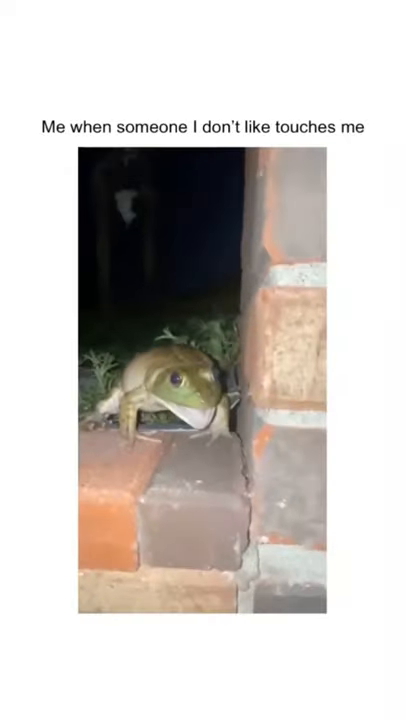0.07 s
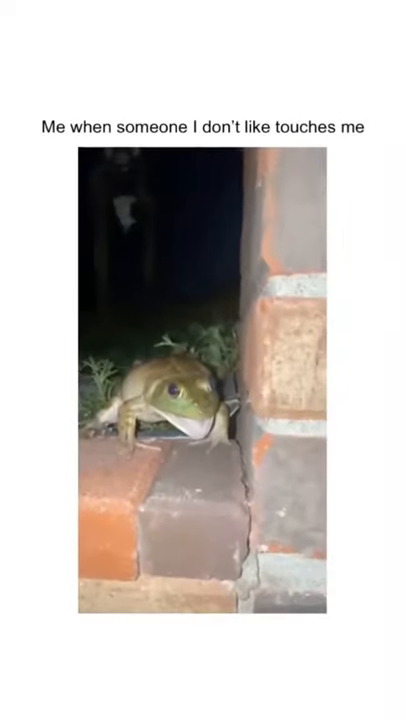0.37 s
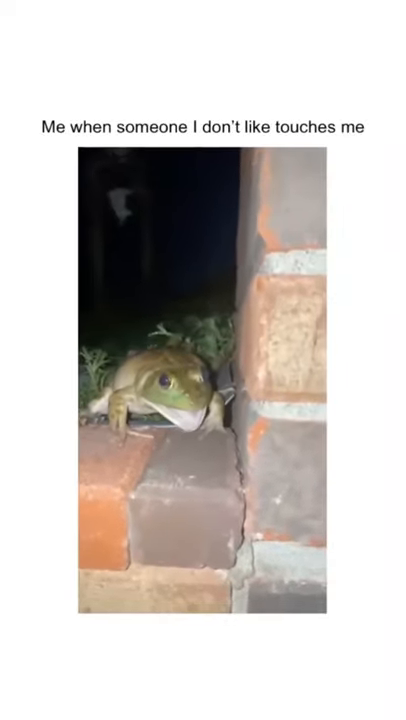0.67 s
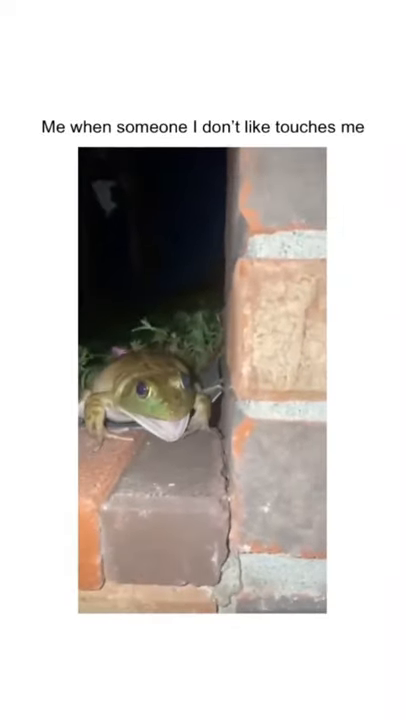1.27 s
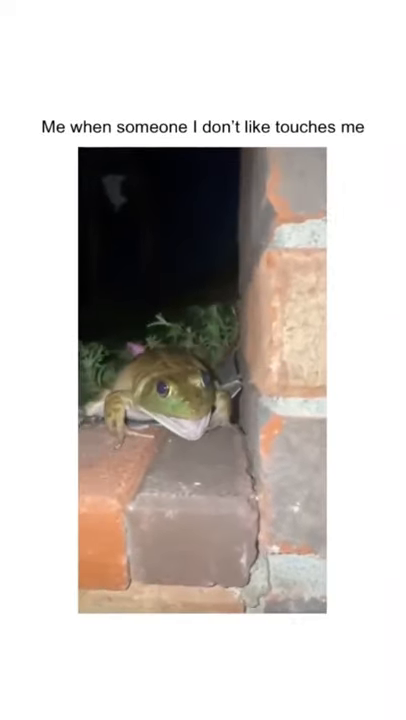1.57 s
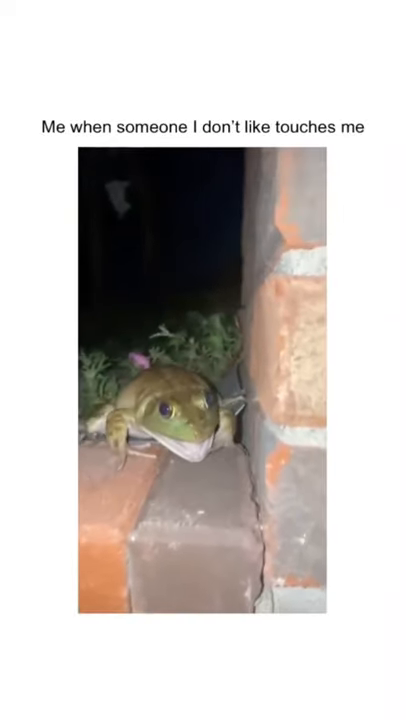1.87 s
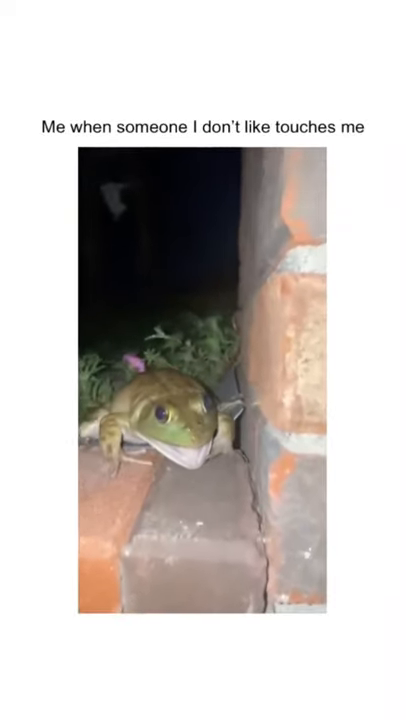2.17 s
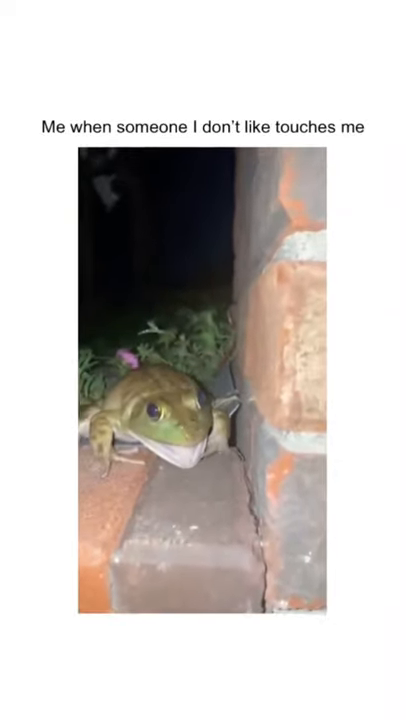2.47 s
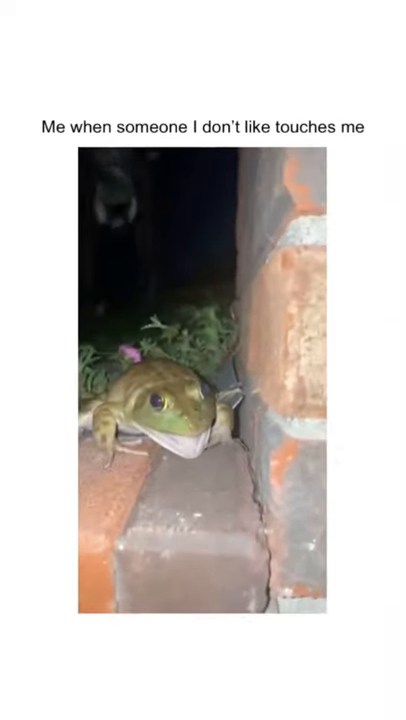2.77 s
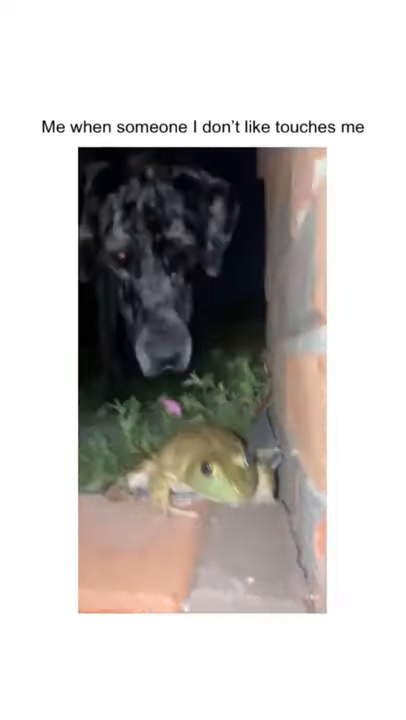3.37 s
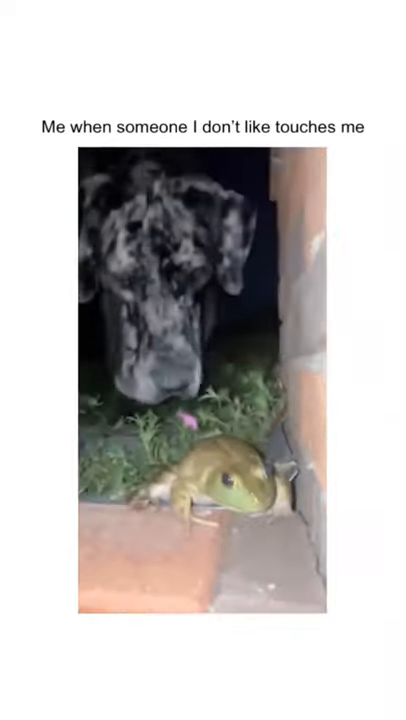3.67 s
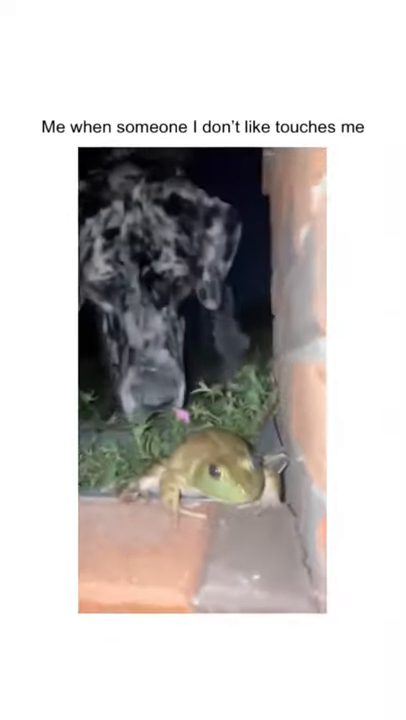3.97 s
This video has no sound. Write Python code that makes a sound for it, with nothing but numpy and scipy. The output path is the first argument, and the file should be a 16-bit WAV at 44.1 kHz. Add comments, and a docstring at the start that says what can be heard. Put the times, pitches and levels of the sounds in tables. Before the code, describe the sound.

A frog screams loudly up close, then breaks into a harsh screech outdoors.

```python
"""Screaming frog at night

A frog on a brick step screams open-mouthed, up close. The clear scream roughens, flips up into a thin
squeal, breaks into a chaotic screech and ends in falling cries and a squeak. Its vocal folds snap
through a resonant throat; the highest notes are whistle-like. Soft handling bumps, faint rustles and
a tick sit over a low outdoor rumble."""
import sys
import numpy as np
from scipy import signal
from scipy.fft import rfft, irfft, next_fast_len
from scipy.io import wavfile
from scipy.ndimage import map_coordinates

SR = 44100
rng = np.random.default_rng(int(sys.argv[2]) if len(sys.argv) > 2 else 0)


def materialize(psi):
    """Save the field psi as 16-bit PCM at rate SR to the path in sys.argv[1].

    A 1-D psi becomes a single channel; in a 2-D psi each row is a channel.
    """
    bounded = np.clip(np.atleast_2d(psi).T, -1, 1)
    quanta = np.round(bounded * 32767).astype(np.int16)
    wavfile.write(sys.argv[1], SR, quanta)


N = 176400

# Night bed, tone: freq_hz, gain_db
NIGHT_EQ = [(15, -50.5), (25, -9.5), (111, 0.5), (174, -9), (385, -17), (1180, -28.5), (3690, -34),
            (7600, -35.5), (9500, -47)]
# Night bed, fader: time_s, level_db
NIGHT_LEVEL = [(0, -52), (2.9, -45), (3.65, -50), (4, -47)]

# Scream, rate of the folds: time_s, pitch_hz
SCREAM_PITCH = [(0.015, 685.1), (0.219, 674.3), (0.455, 668.4), (0.521, 672.8), (0.665, 665.5),
                (0.695, 684), (0.721, 645.6), (0.749, 673.6), (0.765, 667), (0.777, 674.5), (0.807, 661),
                (0.815, 678), (0.913, 687.6), (0.939, 680.4)]
# Scream, envelope: time_s, level_db, roughness (0 is clean)
SCREAM_ENVELOPE = [(0, -16, 0.01), (.2, -14.5, 0.01), (.3, -15, 0.09), (.48, -13, 0.05), (.62, -14, 0.17),
                   (.73, -15.5, 0.2), (.77, -14.5, 0.55), (.86, -16, .6), (.945, -17.5, 1.04),
                   (.965, -27, 0.8), (1.03, -64.5, 1), (1.06, -110, 1.23)]
# Shrill tones, a fixed step above the scream's harmonics: harmonic, gain_db
SHRILL_TONES = [(2, -16), (3, -12), (4, -12.5), (5, -18)]
# Throat and mouth resonances for each voice: freq_hz, gain_db
SCREAM_THROAT = [(300, -47), (680, -21), (950, -25.5), (1350, -13), (1650, -24.5), (2020, -14), (2250, -14),
                 (2700, -7.5), (2980, -16.5), (3380, 0.5), (3700, -1), (4050, -3.5), (4350, -17.5),
                 (4720, -10.5), (5400, -10), (6100, -11), (6400, -13), (6700, -30.5)]
SCREECH_THROAT = [(250, -45), (480, -18.5), (670, -5.5), (900, -8.5), (1250, -4), (1550, -8), (1900, -5),
                  (3000, -2.5), (3450, -3), (3800, 0.5), (4250, -12), (5500, -9), (6400, -12),
                  (6620, -14.5), (7300, -8.5), (8400, -9.5), (9300, -31)]
WAVERING_THROAT = [(400, -54.5), (1200, 1), (3900, 3), (4250, -2), (7000, -37.5)]
CRY_THROAT = [(300, -28), (580, -7.5), (1170, -5.5), (1550, -13), (2350, -5), (3200, -7), (3850, -8),
              (4300, -20.5), (6800, -19), (7900, -20.5), (9300, -40.5)]
# Breath, hoarse and whistling: freq_hz, gain_db
HOARSE_AIR_EQ = [(1000, -40.5), (2700, -18), (3500, -10), (4400, -4.5), (6400, -17), (7400, 5), (8400, 0.5),
                 (9300, -36.5)]
WHISTLE_AIR_EQ = [(500, -30.5), (1400, -13.5), (2100, -29), (2700, -6.5), (3900, -6), (5400, -25),
                  (6500, -4.5), (7600, -20.5), (8250, 2.5), (9200, -32)]

# Sinking squeal and last squeak: time_s, pitch_hz, fundamental_db, overtones_db
SQUEAL = [(.94, 1704, -70, -80), (.968, 1688, -32, -38.5), (1, 1666, -32.5, -29.5),
          (1.026, 1642, -50.5, -33), (1.05, 1615, -30, -33.5), (1.12, 1594, -30, -36.5),
          (1.2, 1575, -34, -34), (1.32, 1517, -33, -38.5), (1.39, 1478, -45, -34), (1.42, 1470, -75, -62)]
SQUEAK = [(2.79, 1102, -55, -40.5), (2.822, 1118, -41, -30), (2.845, 1060, -38.5, -32),
          (2.872, 983, -55, -46), (2.92, 950, -72, -78)]
# Their overtone balance: harmonic, gain_db
SQUEAL_PARTIALS = [(2, -3.5), (3, -1), (4, -10.5)]
SQUEAK_PARTIALS = [(2, -18), (3, -1), (6, -9)]
# Handling bumps: start_s, level_db, pitch_hz, length_s
BUMPS = [(1.122, -34.5, 68, 0.053), (3.643, -36.5, 68.9, 0.034), (3.713, -28, 69.7, 0.049),
         (3.816, -27.5, 58.6, 0.035)]
# Screech, envelope: time_s, level_db
SCREECH_LEVEL = [(1.3, -83.5), (1.329, -37.5), (1.334, -26.5), (1.368, -24), (1.38, -42), (1.402, -33),
                 (1.412, -22.5), (1.44, -37.5), (1.462, -36), (1.475, -26), (1.505, -32), (1.545, -23),
                 (1.625, -28), (1.645, -24), (2.1, -22.5), (2.55, -22.5), (2.615, -21.5), (2.645, -35.5),
                 (2.695, -36), (2.71, -28.5), (2.73, -40), (2.8, -30.5), (2.845, -38), (2.88, -48.5),
                 (2.95, -70)]
# Wavering tone inside the screech: time_s, pitch_hz, level_db
WAVERING_TONE = [(1.38, 1473, -82), (1.43, 1440, -31.5), (1.61, 1418, -27.5), (1.72, 1344, -28),
                 (1.82, 1319, -29), (1.91, 1262, -28.5), (1.97, 1294, -30), (2.1, 1219, -30),
                 (2.45, 1214, -35), (2.58, 1261, -34), (2.64, 1250, -98)]
# Closing cries: start_s, length_s, first_hz, last_hz, level_db, roughness, limp_cycles
CRIES = [(2.627, 0.082, 784.5, 734, -23.5, 0, 0), (2.713, .046, 585.6, 591, -25, 0.17, 0.029),
         (2.761, 0.027, 594.7, 584, -26, .25, 0), (2.781, 0.035, 604.3, 630, -31, .8, 0.013)]

# Plant scuffs: start_s, length_s, level_db, brightness_db
RUSTLES = [(3.155, .055, -42.5, -7), (3.214, 0.054, -42.5, -11.5), (3.253, 0.073, -56.5, 25),
           (3.348, 0.083, -59.5, 25), (3.819, 0.043, -51.5, 22.5), (3.858, 0.079, -54.5, -2.5)]
# Tone of the scuffs' body, their fizz and the tick: freq_hz, gain_db
RUSTLE_BODY_EQ = [(200, -43), (400, 5.5), (520, -8.5), (660, 2.5), (1100, -11.5), (1800, -20.5),
                  (9000, -43)]
RUSTLE_FIZZ_EQ = [(1000, -7), (8000, -4.5), (9500, -16)]
TICK_EQ = [(600, -4), (2000, 11), (3600, -6.5), (9000, -7)]


def amp(db):
    """Decibels to gain."""
    return 10 ** (np.asarray(db) / 20)


def unit(x):
    """Scale to rms 1."""
    return x / np.sqrt(np.mean(x ** 2) + 1e-20)


def clock():
    """Time of each sample in seconds."""
    return np.arange(N) / SR


def curves(rows):
    """One automation curve for each column after the time."""
    times, *columns = np.transpose(rows)
    return [np.interp(clock(), times, column) for column in columns]


def wobble(rate_hz):
    """Smooth random modulation."""
    return map_coordinates(rng.standard_normal(N // 4), [clock() * rate_hz], mode="wrap")


def gate(start_s, length_s, edge_s=0.006):
    """Attack, hold, release."""
    t = clock() - start_s
    return np.clip(np.minimum(t, length_s - t) / edge_s + .5, 0, 1)


def colour(x, eq):
    """Minimum-phase EQ: resonances ring only after each snap."""
    size = 2 * next_fast_len(N // 2 + SR // 10)
    hz, db = np.transpose(eq)
    gain = amp(np.interp(np.log(np.fft.rfftfreq(size, 1 / SR) + 1), np.log(hz), db))
    cepstrum = irfft(np.log(gain))
    cepstrum[1:size // 2] *= 2
    cepstrum[size // 2 + 1:] = 0
    return irfft(rfft(x, size) * np.exp(rfft(cepstrum)))[:N]


def noise(eq):
    """Coloured noise of rms 1."""
    return unit(colour(rng.standard_normal(N), eq))


def night_air():
    """A low outdoor rumble, gently rising and falling."""
    level_db, = curves(NIGHT_LEVEL)
    return amp(level_db) * noise(NIGHT_EQ)


def fold_snaps(hz, rough, jitter, scatter_db=0, limp=0):
    """One snap per vocal-fold cycle; roughness scatters time and size, limp swings alternate snaps."""
    cycles = np.cumsum(hz) / SR
    count = np.arange(1, int(cycles[-1]))
    onsets = np.interp(count, cycles, np.arange(N))
    index = onsets.astype(int)
    rough, limp = [(v * np.ones(N))[index] for v in (rough, limp)]
    time_draw, size_draw = rng.standard_normal((len(count), 2)).T
    shift_cycles = rough * jitter * time_draw + limp * (-1.) ** count
    onsets = onsets + shift_cycles * SR / hz[index]
    taps = np.floor(onsets)[:, None] + np.arange(-7, 9)
    offset = taps - onsets[:, None]
    click = np.sinc(offset) * np.cos(np.pi * offset / 16) ** 2  # can land between samples
    snaps = click * amp(scatter_db * rough * size_draw)[:, None]
    return -np.bincount(np.clip(taps, 0, N - 1).astype(int).ravel(), snaps.ravel(), N)


def scream(shrill_step_hz=5512, air_db=-9):
    """Steady snaps begin to alternate, flutter and roughen, with shrill tones on top and air late on."""
    hz, = curves(SCREAM_PITCH)
    level_db, rough = curves(SCREAM_ENVELOPE)
    hz = hz * (1 + .0005 * wobble(220) + .01 * rough ** .5 * wobble(170))
    limp = 0.014 * rough * (1 + wobble(260))
    snaps = fold_snaps(hz, rough ** 2, jitter=.02, scatter_db=3.5, limp=limp)
    voice = unit(colour(snaps, SCREAM_THROAT))
    phase = 2 * np.pi * np.cumsum(hz) / SR
    step_phase = 2 * np.pi * shrill_step_hz * clock()
    shrill = np.zeros(N)
    for harmonic, gain_db in SHRILL_TONES:
        flicker = amp(gain_db + rough * (3 * wobble(110) - 12))  # ducks as the voice roughens
        shrill += flicker * np.sin(round(harmonic) * phase + step_phase + rough * wobble(300))
    shrill *= 1 + rough * np.cos(phase / 2)  # throbs on every other cycle
    air = unit(noise(HOARSE_AIR_EQ) * (1 + np.cos(phase)))
    envelope = amp(level_db + 1.5 * rough * wobble(130))
    return envelope * (voice + np.sqrt(2) * shrill + amp(air_db) * rough ** 1.5 * air)


def brick_reverb(x, wet_db=-26, t60_s=.25):
    """A faint, short answer from the brickwork."""
    tail = (rng.standard_normal(N) * amp(-60 * clock() / t60_s))[:SR // 3]
    return x + amp(wet_db) * signal.fftconvolve(x, tail / np.linalg.norm(tail))[:N]


def whistle(track, partials, air_db):
    """The voice's high register: a fundamental and fluttering overtones over rushing air."""
    hz, fundamental_db, overtones_db = curves(track)
    phase = 2 * np.pi * np.cumsum(hz * (1 + .004 * wobble(350))) / SR
    overtones = sum(amp(db + 2.8 * wobble(110)) * np.sin(round(k) * phase) for k, db in partials)
    top = unit(overtones) + amp(air_db) * noise(WHISTLE_AIR_EQ)
    sounding = (clock() > track[0][0]) & (clock() < track[-1][0])
    return sounding * (amp(fundamental_db) * unit(np.sin(phase)) + amp(overtones_db) * top)


def handling_bumps():
    """Soft thumps, a few low cycles each, as a hand shifts its grip."""
    out = np.zeros(N)
    for start_s, level_db, hz, length_s in BUMPS:
        progress = np.clip((clock() - start_s) / length_s, 0, 1)
        swell = np.abs(np.sin(np.pi * progress ** 0.36))
        out += amp(level_db) * swell * np.sin(2 * np.pi * hz * length_s * progress)
    return out


def racing_pitch(start_hz=590, rise_hz_per_s=11000, slips_per_s=36):
    """An uneven sawtooth of pitch: the folds keep racing up and slipping back."""
    slips_s = np.cumsum(np.exp(.4 * rng.standard_normal(400)) / slips_per_s)
    since_slip_s = clock() - np.r_[0, slips_s][np.searchsorted(slips_s, clock())]
    return start_hz + rise_hz_per_s * np.minimum(since_slip_s, 1.2 / slips_per_s)


def screech(locked_hz=676, race_from_s=1.95, race_fade_s=0.73, slap_hz=260.9, slap_db=-4.5, air_db=-13):
    """The folds snap chaotically around one pitch, then start to race, with stray hard slaps below."""
    level_db, = curves(SCREECH_LEVEL)
    shaky_hz = locked_hz * np.exp(.06 * wobble(170))
    locked = fold_snaps(shaky_hz, rough=1, jitter=0.05, scatter_db=3, limp=0.05 * wobble(60))
    racing = fold_snaps(racing_pitch(), rough=1, jitter=0.042)
    slaps = fold_snaps(slap_hz * np.exp(.5 * wobble(150)), rough=1, jitter=.3, scatter_db=3)
    blend = np.clip((clock() - race_from_s) / race_fade_s, 0, 1)
    snaps = np.sqrt(1 - blend) * unit(locked) + np.sqrt(blend) * unit(racing) + amp(slap_db) * unit(slaps)
    voice = unit(unit(colour(snaps, SCREECH_THROAT)) + amp(air_db) * noise(SCREECH_THROAT))
    return amp(level_db + 0.52 * wobble(90)) * darken(voice)


def darken(voice, from_s=1.72, db_per_s=9.5, above_hz=4200):
    """The screech loses treble as pressure falls."""
    treble = signal.sosfiltfilt(signal.butter(4, above_hz, "high", fs=SR, output="sos"), voice)
    treble_gain = amp(-db_per_s * np.maximum(clock() - from_s, 0))
    return voice - (1 - treble_gain) * treble


def wavering_tone(waver=.012):
    """Fast snaps make a high, unsteady tone that sinks through the screech."""
    hz, level_db = curves(WAVERING_TONE)
    hz = hz * (1 + waver * (wobble(70) + wobble(300)))
    snaps = fold_snaps(hz, rough=0.97, jitter=.013, scatter_db=2)
    tone = unit(colour(snaps, WAVERING_THROAT))
    return amp(level_db + 1.4 * wobble(70)) * tone * (clock() > WAVERING_TONE[0][0])


def cries(glide_curve=2.5, air_db=-13):
    """As pressure runs out the folds lock into short, bending notes; limping snaps add a sub-octave."""
    out = np.zeros(N)
    for start_s, length_s, first_hz, last_hz, level_db, rough, limp in CRIES:
        glide = np.clip((clock() - start_s) / length_s, 0, 1) ** glide_curve
        hz = (first_hz + (last_hz - first_hz) * glide) * (1 + 0.01 * rough * wobble(250))
        snaps = fold_snaps(hz, rough, jitter=0.02, scatter_db=7.0, limp=limp)
        voice = unit(colour(snaps, CRY_THROAT)) + amp(air_db) * noise(HOARSE_AIR_EQ)
        out += amp(level_db) * gate(start_s, length_s) * voice
    return out


def rustles(fizz_db=-7.5):
    """Soft scuffs among the plants: a dull body blended with grainy fizz."""
    body = noise(RUSTLE_BODY_EQ) * amp(1.1 * wobble(110))
    fizz = noise(RUSTLE_FIZZ_EQ) * amp(3.5 * wobble(250))
    return sum(amp(level_db) * gate(start_s, length_s) * unit(body + amp(fizz_db + bright_db) * fizz)
               for start_s, length_s, level_db, bright_db in RUSTLES)


def tick(start_s=3.515, level_db=-49.5, t60_s=0.039):
    """One small tick: a burst of noise that dies fast."""
    t = clock() - start_s
    return noise(TICK_EQ) * (t > 0) * amp(level_db - 60 * np.abs(t) / t60_s)


def scene():
    """Mono mix: the frog against the brickwork, small dry noises and the night bed."""
    frog = scream() + whistle(SQUEAL, SQUEAL_PARTIALS, air_db=-5.5)
    frog += screech() + wavering_tone()
    frog += cries() + whistle(SQUEAK, SQUEAK_PARTIALS, air_db=-10.0)
    return (night_air() + brick_reverb(frog) + handling_bumps() + rustles() + tick())[None]


def record(dry, top_hz=9900):
    """A sheer high cut on the whole mix."""
    size = next_fast_len(N + SR // 2)
    passband = np.fft.rfftfreq(size, 1 / SR) < top_hz
    return irfft(rfft(dry, size) * passband, size)[:, :N]


dry = scene()
out = record(dry)
materialize(out)
```